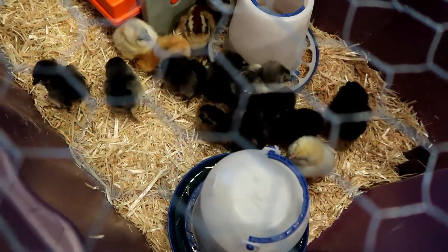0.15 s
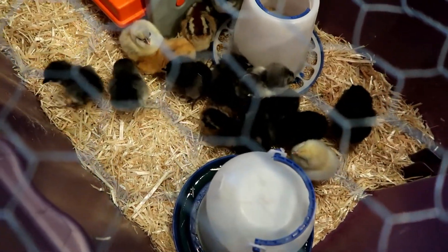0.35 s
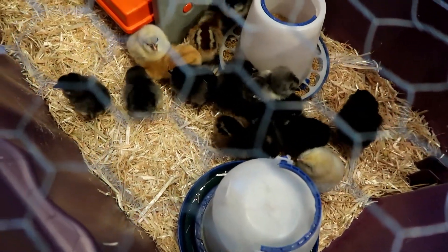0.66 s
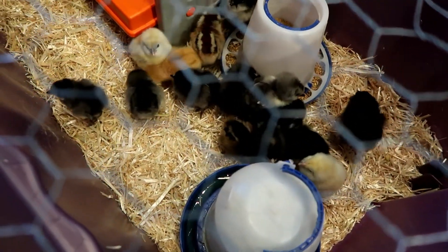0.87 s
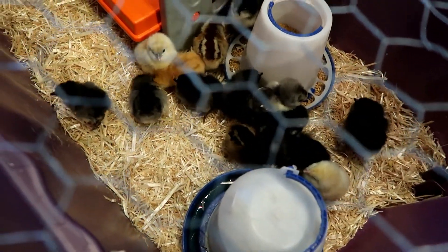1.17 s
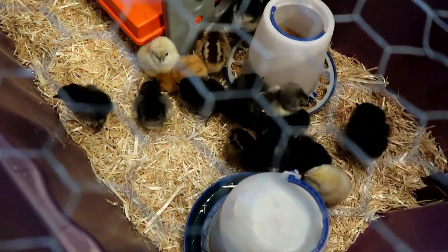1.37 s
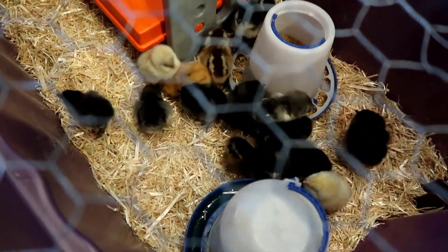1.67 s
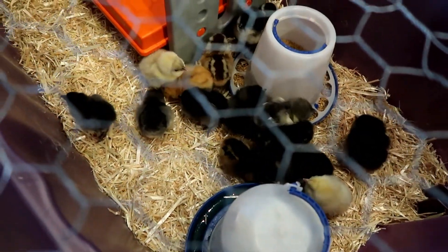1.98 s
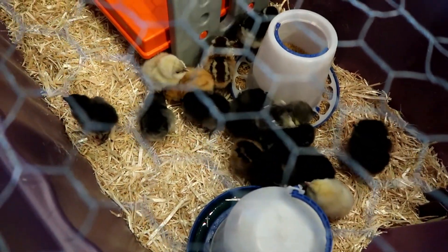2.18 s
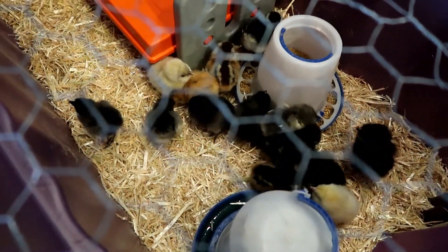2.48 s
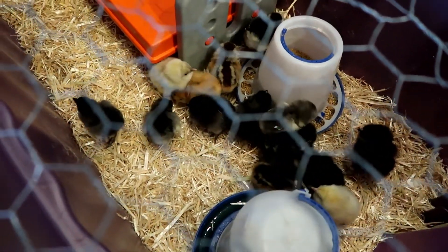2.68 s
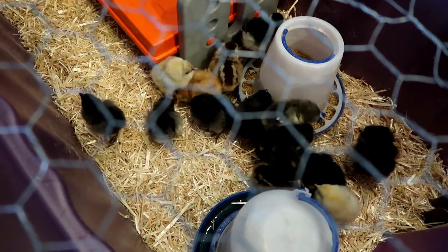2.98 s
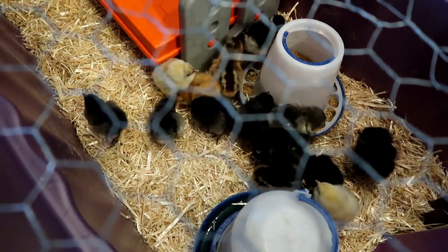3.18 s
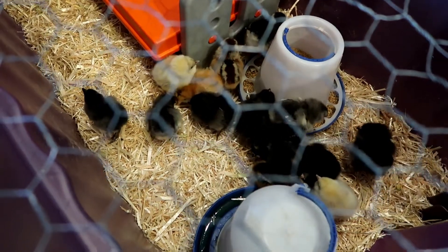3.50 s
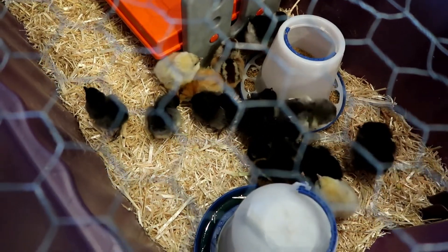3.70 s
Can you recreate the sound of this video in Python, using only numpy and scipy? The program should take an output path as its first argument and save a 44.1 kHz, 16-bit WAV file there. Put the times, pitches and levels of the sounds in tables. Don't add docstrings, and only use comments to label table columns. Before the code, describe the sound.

Baby chicks peep nonstop in a straw-lined brooder, clear whistling chirps that hold then drop in pitch, overlapping at different distances; a few beak taps on plastic, faint straw rustle, close handheld microphone.

```python
import sys
import numpy as np
from scipy import signal
from scipy.fft import rfft, irfft
from scipy.io import wavfile
from scipy.ndimage import uniform_filter1d

SR = 44100
rng = np.random.default_rng(int(sys.argv[2]) if len(sys.argv) > 2 else 0)


def decibels_to_gain(level_db):
    exponent = np.asarray(level_db, float) / 20
    return 10 ** exponent


def master(y):
    cut = np.clip(np.atleast_2d(y).T, -1, 1)
    pcm = np.round(cut * 32767)
    wavfile.write(sys.argv[1], SR, pcm.astype(np.int16))


N = 169785
FADE_S = 0.004


def band(x, hz, width_hz, passes=1):
    for _ in range(passes):
        x = signal.lfilter(*signal.iirpeak(hz, hz / width_hz, fs=SR), x)
    return x


def level(x, db):
    return x * decibels_to_gain(db) / np.sqrt(np.mean(x ** 2))


def walk(rate_hz):
    bump = np.hanning(int(2 * SR / rate_hz))
    return level(signal.fftconvolve(rng.standard_normal(N), bump, "same"), 0)


def add(out, start_s, x):
    i = max(int(start_s * SR), 0)
    out[i:i + len(x)] += x[:N - i]


def ring(hz, db, t60_s):
    t = np.arange(SR // 3) / SR
    return decibels_to_gain(db - 60 * t / t60_s) * np.sin(2 * np.pi * hz * t)


def whistle(drift, s, hz, db, second_db, third_db, hidden_hz=0):
    t = s[0] - FADE_S + np.arange(int((s[-1] - s[0] + 2 * FADE_S) * SR)) / SR
    at = np.clip((t * SR).astype(int), 0, N - 1)
    wobble, shimmer = 0.0033 * drift[0][at], 1.72 * drift[1][at]
    glide = uniform_filter1d(np.interp(t, s, hz), int(2.1 * SR / 1000), mode="nearest")
    pitch = glide * (1 + wobble)
    phase = 2 * np.pi * np.cumsum(pitch) / SR
    hidden_phase = 2 * np.pi * hidden_hz * t
    edge_s = np.r_[s[0] - FADE_S, s, s[-1] + FADE_S]
    edge_db = np.r_[db[0] - 20, db, db[-1] - 20]
    gain = decibels_to_gain(np.interp(t, edge_s, edge_db) + shimmer)

    both = np.clip((pitch - hidden_hz) / 300, 0, 1) * (hidden_hz > 0)
    apart = np.clip((pitch - hidden_hz) / 900, 0, 1)
    alone = 1 - both * apart

    second_patch, third_patch = 2.5 * drift[2][at], 2.5 * drift[2][N - 1 - at]
    fuzz = 1 + 0.45 * drift[3][at]
    mouth_db = -5 * np.maximum(2 * pitch - 6020, 0) / 1000
    second = alone * fuzz * decibels_to_gain(second_db + mouth_db + second_patch) * np.sin(2 * phase)
    upper = alone * np.sin(3 * phase) + both * np.sin(phase + 2 * hidden_phase)
    third = decibels_to_gain(third_db + third_patch) * fuzz * upper
    sum_tone = decibels_to_gain(second_db - 19.5 + second_patch) * fuzz * np.sin(phase + hidden_phase)
    difference_tone = decibels_to_gain(-34.5) * apart ** 4 * np.sin(phase - hidden_phase)
    wave = np.sin(phase) + second + third + both * (sum_tone + difference_tone)
    return np.sqrt(2) * gain * wave


def place(x, echo_ms, echo_db, pan_db, lead_us):
    w = 2j * np.pi * np.arange(N // 2 + 1) * SR / N
    side = np.array([[1], [-1]]) / 2
    ports = decibels_to_gain(pan_db * side) * np.exp(w * side * lead_us * 1e-6)
    wall = (1 + decibels_to_gain(echo_db) * np.exp(-w * echo_ms / 1000)) / np.hypot(1, decibels_to_gain(echo_db))
    return irfft(rfft(x) * ports * wall, N)


# stage, pitch_ratio, level_db
SLOPER = [(0, .93, -40), (.13, .995, -33), (.4, .98, -22), (.64, .935, -14), (.87, .893, -14),
          (1, .79, -16), (1.35, .715, -13), (1.65, .605, -26), (2, .47, -52)]
# stage, pitch_ratio, level_db
STEPPER = [(0, .92, -38), (.14, .94, -29), (.45, .99, -26), (.74, .995, -20), (.88, .96, -18),
           (.985, .91, -20), (1.04, .795, -22), (1.75, .64, -25), (2, .57, -44)]
# stage, pitch_ratio, level_db
STEPPER_UPPER = [(-.05, .965, -44), (.15, .995, -31), (.4, 1.012, -29), (.6, 1.008, -44)]
# stage, pitch_ratio, level_db
KINKED = [(0, .98, -36), (.15, .99, -27), (.5, .95, -18), (.85, .9, -11), (1, .79, -16), (1.13, .705, -15),
          (1.4, .655, -21), (1.7, .58, -28), (2, .48, -42)]
# stage, pitch_ratio, level_db
FLAT = [(0, .94, -38), (.1, 0.92, -22.5), (.5, 0.98, -24), (.9, 0.97, -13), (1.08, .93, -19),
        (1.45, .92, -17), (1.75, .82, -19.5), (2, 0.58, -37)]
# stage, pitch_ratio, level_db
HIGH = [(0, .92, -44), (.45, 1.0, -39), (.75, .95, -38), (1, .83, -34), (1.25, .74, -25), (1.6, .63, -31),
        (2, .48, -33)]
# stage, pitch_ratio, level_db
ARCH = [(0, .87, -58), (.4, .97, -49), (1, 1.0, -45), (1.6, .98, -49), (2, .9, -58)]
# stage, pitch_ratio, level_db
SLIDE = [(0, 1.0, -42), (.45, .965, -30), (1, .8, -28), (1.6, .69, -30), (2, .6, -42)]
# stage, pitch_ratio, level_db
HOOK = [(0, 1.6, -37), (1, 1.0, -24.5), (1.68, 1.01, -24.5), (2, .76, -42.5)]
# stage, pitch_ratio, level_db
RISE = [(0, .96, -44), (1, 1.03, -36), (1.3, 1.1, -42), (2, 1.45, -44)]
# stage, pitch_ratio, level_db
STEPPER_TOP = [(-.1, 1.05, -54), (.2, 1.065, -44), (.5, 1.075, -52)]
# stage, pitch_ratio, level_db
STROKE = [(0, .84, -53.5), (1, .92, -40), (2, 1.0, -43)]
# start_s, knee_s, end_s, top_hz, level_db
SLOPER_PEEPS = [(1.122, 1.271, 1.323, 4510, 1), (1.579, 1.718, 1.761, 4456, 1),
                (2.029, 2.171, 2.224, 4520, -0.5), (2.538, 2.699, 2.744, 4449, 2)]
STEPPER_PEEPS = [(.184, 0.344, 0.39, 4740, 0), (.84, .966, 1.042, 4812, -3),
                 (1.625, 1.773, 1.81, 4890, -1.5), (2.211, 2.376, 2.44, 4810, 0),
                 (2.79, 2.962, 3.023, 4868, 0.5), (3.414, 3.597, 3.675, 4816, 0)]
KINKED_PEEPS = [(2.961, 3.097, 3.153, 4684, 2.8)]
FLAT_PEEPS = [(0.216, 0.347, .427, 3935, 0.22), (0.687, 0.802, .885, 3948, 0.77)]
HIGH_PEEPS = [(3.265, 3.41, 3.46, 5730, 1)]
SLIDE_PEEPS = [(3.826, 3.86, 3.9, 4200, 3), (.435, .46, .478, 3700, -8), (2.335, 2.385, 2.422, 4250, -4),
               (2.905, 2.97, 3.0, 4000, -4)]
HOOK_PEEPS = [(.77, .782, .826, 3000, 5), (2.78, 2.818, 2.856, 2950, 0), (3.295, 3.358, 3.385, 2960, -3)]
RISE_PEEPS = [(.625, .64, .655, 2700, -4), (1.925, 1.947, 1.963, 2420, -2), (3.5, 3.527, 3.545, 2650, 0)]
ARCH_PEEPS = [(1.425, 1.46, 1.48, 5850, -1), (2.035, 2.058, 2.08, 5950, 1), (2.3, 2.317, 2.335, 5951, 0),
              (2.75, 2.785, 2.8, 5900, 1), (3.055, 3.09, 3.105, 5900, 1)]
STROKE_PEEPS = [(.652, .658, .668, 4750, -3), (2.132, 2.145, 2.156, 3400, 0),
                (2.576, 2.587, 2.597, 4200, 0), (2.56, 2.568, 2.576, 5150, -3)]
# echo_ms, echo_db, pan_db, lead_us, second_db, third_db
FAR = (3.5, -8, -1.5, 6.5, -23, -48.5)
# shape, peeps, echo_ms, echo_db, pan_db (left - right), lead_us (left first),
# second_db, third_db (harmonics)
CHICKS = [(SLOPER, SLOPER_PEEPS, 2.1, -4, -1.4, -18.5, -28.5, -44),
          (STEPPER, STEPPER_PEEPS, 2.94, -7, 5, 26.3, -15, -43), (STEPPER_UPPER, STEPPER_PEEPS, *FAR),
          (KINKED, KINKED_PEEPS, 2.298, -12, -0.66, -21.5, -26.5, -44),
          (FLAT, FLAT_PEEPS, 2.5, -7, -1.4, -19, -19.5, -35), (HIGH, HIGH_PEEPS, *FAR[:4], -13, -60.5),
          (ARCH, ARCH_PEEPS, *FAR), (SLIDE, SLIDE_PEEPS, *FAR), (HOOK, HOOK_PEEPS, *FAR[:4], -38, -55.5),
          (RISE, RISE_PEEPS, *FAR), (STEPPER_TOP, STEPPER_PEEPS, *FAR), (STROKE, STROKE_PEEPS, *FAR)]


def calling_chicks():
    out = 0
    for shape, peeps, *where, second_db, third_db in CHICKS:
        stage, ratio, db = np.array(shape).T
        hidden_ratio = 0
        if shape == STEPPER:
            hidden_ratio = 0.805
        elif shape in (SLOPER, KINKED):
            hidden_ratio = 0.895
        x, drift = np.zeros(N), (walk(120), walk(120), walk(60), walk(800))
        for start, knee, end, top_hz, gain_db in peeps:
            rising = start + stage * (knee - start)
            falling = knee + (stage - 1) * (end - knee)
            s = np.where(stage < 1, rising, falling)
            peep = whistle(drift, s, ratio * top_hz, db + gain_db, second_db, third_db, hidden_ratio * top_hz)
            add(x, s[0] - FADE_S, peep)
        out = out + place(x, *where)
    return out


# time_s, pitch_hz, level_db
SOLOS = [
    [(0.002, 3790, -34), (0.022, 3530, -30), (0.032, 3350, -39), (0.05, 3054, -23), (0.063, 2120, -44)],
    [(0.09, 5200, -54), (0.116, 5160, -53), (0.136, 4650, -36.5), (0.176, 4510, -37.5), (0.184, 4400, -25),
     (0.196, 4225, -30), (0.216, 2970, -20), (0.25, 2382, -33)],
    [(.285, 4600, -30), (.33, 4450, -15), (.35, 4290, -20), (.37, 4100, -21), (.4, 3620, -23),
     (.42, 3200, -17.5), (.436, 3030, -21.5), (.447, 2400, -32)],
    [(0.673, 4254, -37.5), (0.691, 4583, -38), (0.735, 4530, -32.5), (0.765, 4268, -11.5),
     (0.797, 4175, -17.5), (0.809, 3830, -23.5), (0.841, 3370, -18.5), (0.862, 2605, -42.5)],
    [(0.982, 3928, -37), (1.008, 4195, -26), (1.034, 3845, -21), (1.07, 3320, -19), (1.088, 2834, -27.5),
     (1.112, 2450, -44.5)],
    [(1.848, 5670, -55), (1.876, 5890, -44.5), (1.914, 5270, -39), (1.96, 3285, -32), (1.968, 2890, -41),
     (1.974, 2780, -47.5)],
    [(2.015, 3770, -52.5), (2.033, 4100, -43), (2.055, 3687, -53), (2.071, 3650, -52), (2.111, 3460, -44.5),
     (2.142, 2800, -44.5)],
    [(2.46, 3668, -42), (2.494, 3680, -38.5), (2.506, 3258, -32), (2.518, 3170, -30.5), (2.54, 2620, -44.5)],
    [(2.83, 5780, -52.5), (2.882, 5620, -38.5), (2.916, 5120, -34), (2.932, 4440, -33),
     (2.964, 3010, -25.5), (2.972, 2795, -36.5)],
    [(3.63, 4375, -26), (3.646, 4274, -28), (3.662, 4217, -17), (3.714, 3900, -13.5), (3.72, 3684, -17),
     (3.73, 3144, -10.5), (3.764, 2790, -37), (3.792, 2273, -25.5)],
]
# echo_ms, echo_db, pan_db, lead_us, second_db, third_db
SOLO_PLACE = (3.5, -16.5, -1.5, -14, -23, -46)


def solo_peeps():
    x, drift = np.zeros(N), (walk(120), walk(120), walk(60), walk(800))
    *where, second_db, third_db = SOLO_PLACE
    for rows in SOLOS:
        s, hz, db = np.array(rows).T
        add(x, s[0] - FADE_S, whistle(drift, s, hz, db, second_db, third_db))
    return place(x, *where)


# start_s, peak_db
TAPS = [(0.824, -21.5), (1.572, -15), (3.254, -18), (3.345, -35.5)]
# pitch_hz, level_db, t60_s
FEEDER = [(429, -8, 0.2), (567, -10, 0.057), (1355, -4.5, 0.028), (1870, -12, 0.077), (2925, -14, 0.21),
          (4350, -8, 0.022)]


def feeder_taps():
    out, t = np.zeros(N), np.arange(SR // 3) / SR
    for s, db in TAPS:
        noise = band(rng.standard_normal(len(t)), 2190, 2 * 2190, passes=2)
        crack = decibels_to_gain(5) * noise * np.exp(-t * 1000 / 5.6)
        add(out, s, decibels_to_gain(db - 7.5) * (crack + sum(ring(*mode) for mode in FEEDER)))
    return out


# start_s, length_s, level_db
SHUFFLES = [(1.114, 0.066, -44.5), (1.336, 0.11, -44.5), (1.458, 0.051, -56)]
# centre_hz, width_hz, level_db
STRAW = [(327, 110, 4), (655, 100, -14), (1390, 650, -7)]


def straw_shuffles():
    out, time = np.zeros(N), np.arange(N) / SR
    noise = rng.standard_normal(N) * decibels_to_gain(1.9 * walk(60))
    bands = [decibels_to_gain(db) * level(band(noise, hz, width, passes=2), 0) for hz, width, db in STRAW]
    straw = level(sum(bands), 0)
    for s, length, db in SHUFFLES:
        edges = [s - .006, s, s + length, s + length + 0.0073]
        out += straw * decibels_to_gain(db) * np.interp(time, edges, [0, 0.97, 1.0, 0.078])
    return out


# start_s, pitch_hz, peak_db, t60_s
BUMPS = [(1.945, 42.4, -43, 0.14), (2.5, 140, -50, 0.17), (2.614, 142.6, -40.5, .1),
         (2.614, 49, -34.5, 0.24), (2.699, 165, -30, 0.059), (2.765, 153.5, -41, 0.14),
         (2.808, 164.3, -34.5, 0.094), (3.301, 41.9, -43.5, 0.37), (3.545, 178.5, -40.5, 0.065)]


def hand_bumps():
    out, t = np.zeros(N), np.arange(SR // 3) / SR
    for s, hz, db, t60_s in BUMPS:
        add(out, s, ring(hz, db + 13.0, t60_s) * np.minimum(t * hz, 1))
    return out


def tail(db, t60_s):
    t = np.arange(SR) / SR
    unit_energy = np.sqrt(2 * np.log(1000) / t60_s / SR)
    return decibels_to_gain(db - 60 * t / t60_s) * rng.standard_normal((2, SR)) * unit_energy


def reverb(dry):
    room = signal.lfilter(*signal.butter(2, 5600, fs=SR), tail(-11.5, 0.42))
    box = tail(-10, 0.11)
    onset = np.minimum(np.arange(SR) / SR / 0.002, 1)
    return signal.fftconvolve(dry.mean(0)[None], (room + box) * onset, axes=1)[:, :N]


# pitch_hz, level_db (per Hz)
FLOOR = [(25, -17.5), (60, -4), (300, -12.5), (1200, -26.5), (2200, -28.5), (4000, -14), (5600, -44.5),
         (14000, -61.5)]


def room_air():
    out, swell = 0, walk(0.22)
    floor_hz, floor_db = np.array(FLOOR).T
    for hz in 30 * 2 ** np.arange(0, 9, .5):
        mid, side = band(rng.standard_normal((2, N)), hz, hz / 2, passes=3)
        db = np.interp(np.log(hz), np.log(floor_hz), floor_db) + 0.5 * swell + 1.2 * walk(7.2)
        width = min(hz / 1110, 1.0)
        out = out + decibels_to_gain(db) * (mid + width * side * np.array([[1], [-1]]))
    return level(out, -46)


def hum():
    return level(band(rng.standard_normal(N), 54.3, 12), -54.5)


def scene():
    dry = calling_chicks() + solo_peeps() + feeder_taps() + straw_shuffles()
    return dry + reverb(dry) + hand_bumps() + room_air() + hum()


def top_cut(x):
    return signal.sosfilt(signal.butter(12, 15730, fs=SR, output="sos"), x)


def record(dry):
    return top_cut(dry)


dry = scene()
out = record(dry)
master(out)
```